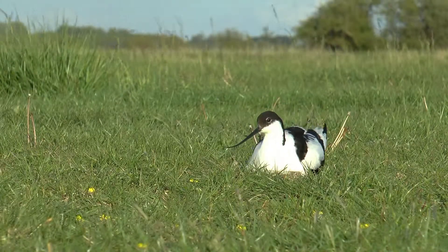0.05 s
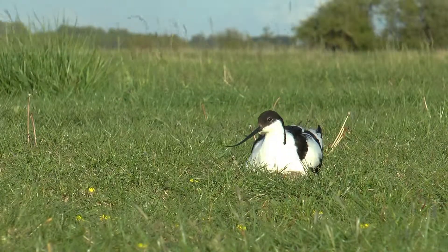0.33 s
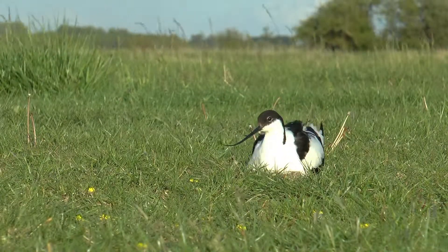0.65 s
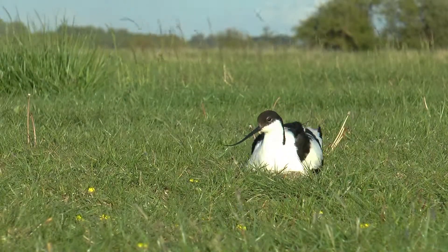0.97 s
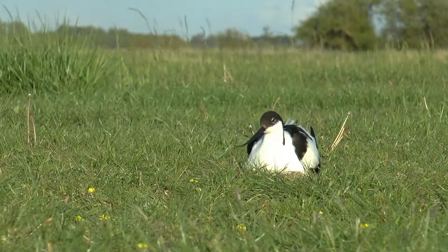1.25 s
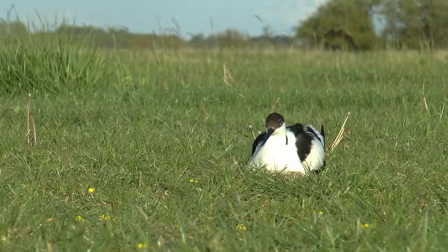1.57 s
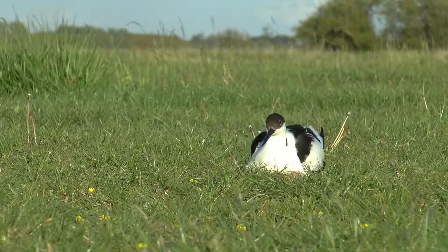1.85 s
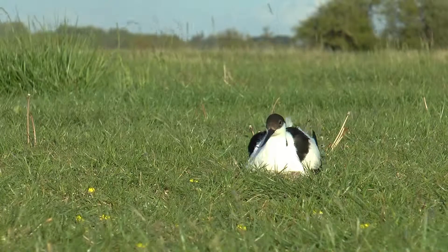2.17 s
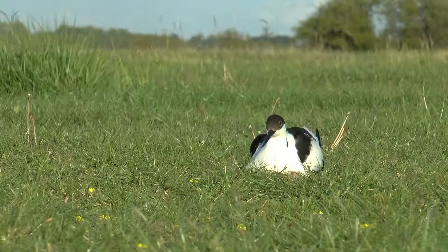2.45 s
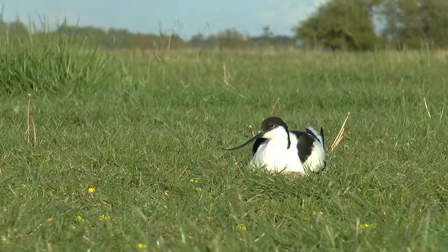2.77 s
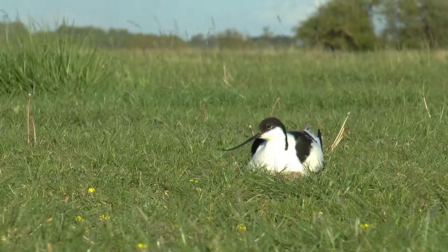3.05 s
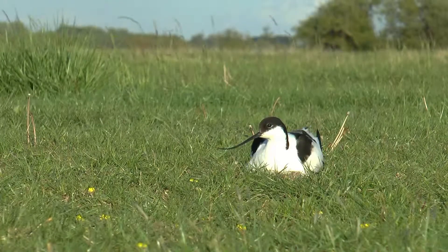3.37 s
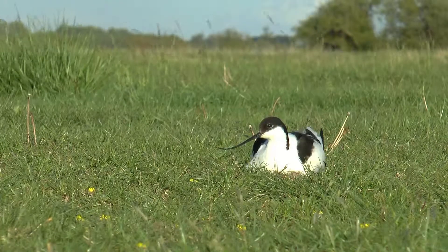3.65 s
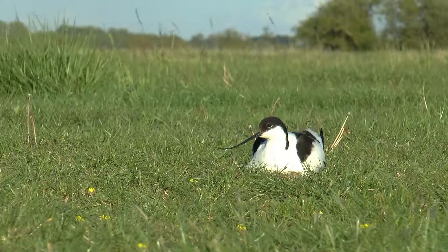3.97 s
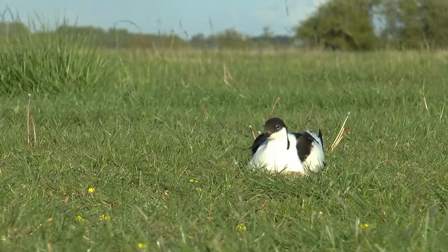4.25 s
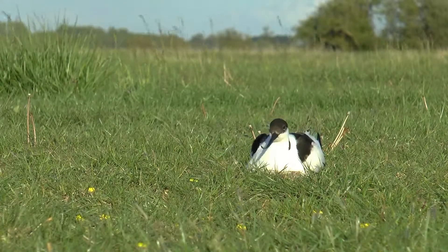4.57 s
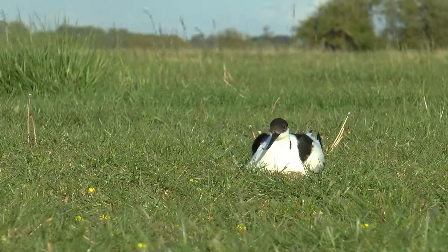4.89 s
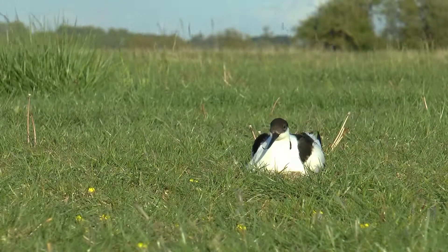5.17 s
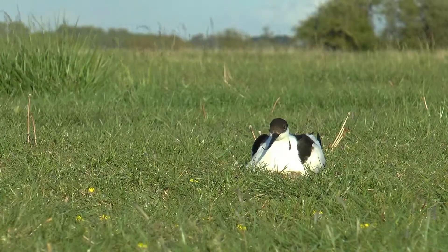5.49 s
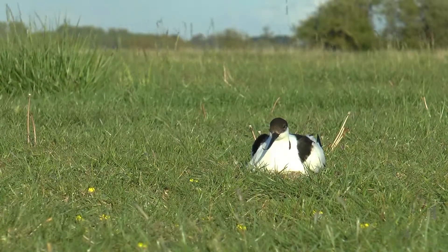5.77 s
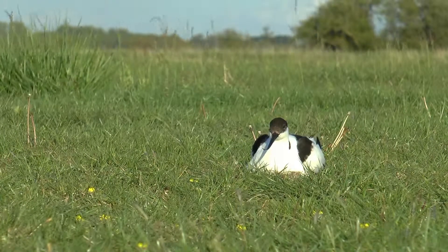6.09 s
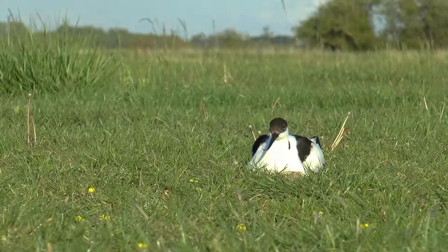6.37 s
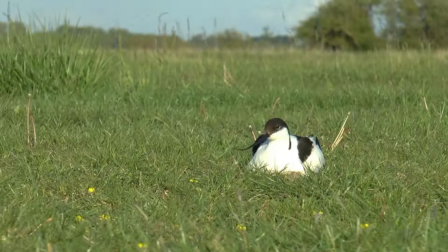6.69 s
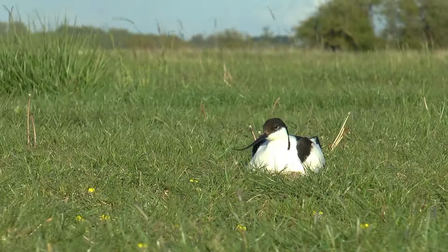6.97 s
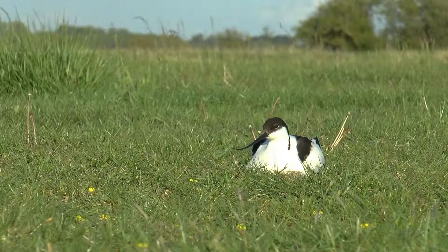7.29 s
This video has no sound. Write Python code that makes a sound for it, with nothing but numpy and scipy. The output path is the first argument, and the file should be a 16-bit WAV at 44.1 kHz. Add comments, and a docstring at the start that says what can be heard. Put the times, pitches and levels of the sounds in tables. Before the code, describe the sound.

Wind rumbles on a stereo microphone in an open meadow, with frequent fluttering gusts. Beneath it, wading birds repeat high, fluty two-part whistles, between two and three a second, mixed with short sharp notes. About halfway through, a distant bird starts a run of faint pips and another answers. The nearer calls grow louder, peak with one sharp yelp, then fade while the gusts carry on.

```python
"""A breeze rises over the hiss of a meadow and the wash of a far colony; gusts buffet a stereo microphone.
From the start avocets whistle "ku-lee" calls and short "kip" notes, each an arch of pitch with harmonics.
Near 3.7 s comes a held note, then a far bird's run of pips, which lower pips soon answer.
The calls are loudest around 5 s and a sharp yelp follows at 5.5 s. Then they fade, and two faint
falling whistles cross the meadow while the gusts go on."""
import sys
import numpy as np
from scipy import signal
from scipy.fft import rfft, irfft
from scipy.io import wavfile
from scipy.ndimage import uniform_filter1d

SR = 44100
rng = np.random.default_rng(int(sys.argv[2]) if len(sys.argv) > 2 else 0)


def persist_wave(psi):
    """Save psi, clipped to +-1, as 16-bit WAV."""
    counts = np.round(np.clip(psi, -1, 1) * 32767).astype(np.int16)
    wavfile.write(sys.argv[1], SR, np.atleast_2d(counts).T)


N = 332514
TIME_S, BIN_HZ = np.arange(N) / SR, np.arange(N // 2 + 1) * SR / N

# arch of a far pip: (time [share of length], pitch [share of top], relative level [dB])
PIP_ARCH = [(0, .78, -13), (.22, .95, -4), (.5, 1, 0), (.78, .97, -4), (1, .81, -14)]


def undb(db):
    """Amplitude grows tenfold for every 20 dB."""
    return 10 ** (np.asarray(db) / 20)


def unit(x):
    """Normalisation to an rms of 1."""
    return x / np.sqrt(np.mean(x ** 2))


def on_log(table, hz):
    """Interpolation of (frequency [Hz], value) points on a logarithmic frequency axis."""
    f, value = np.transpose(table)
    return np.interp(np.log(hz + 1), np.log(f), value)


def noise(gain):
    """Spectral shaping: white noise weighted by a gain at each frequency bin."""
    return irfft(rfft(rng.standard_normal(N)) * gain, N)


def walk(rate_hz):
    """Random modulation of rms 1: stepped values, smoothed twice."""
    hold = max(int(SR / rate_hz), 2)
    steps = np.repeat(rng.standard_normal(N // hold + 1), hold)
    return unit(uniform_filter1d(uniform_filter1d(steps, hold), hold)[:N])


def add(out, s, sound, pan_db=0):
    """Level panning: a mono sound enters at time s, with left exceeding right by pan_db."""
    start = int(s * SR)
    part = sound[:max(N - start, 0)]
    out[:, start:start + len(part)] += undb(np.array([[pan_db], [-pan_db]]) / 2) * part


def wash(spectrum, db, side_db):
    """Partial coherence: independent mid and side noises of one colour make a wide, steady sound."""
    colour = undb(on_log(spectrum, BIN_HZ))
    mid, side = unit(noise(colour)), undb(side_db) * unit(noise(colour))
    return undb(db) * np.array([mid + side, mid - side])


def meadow(swell_db=.8):
    """Incoherent summation: a far colony blurs into a wash, over soft air and microphone hiss."""
    # spectra of the colony and of the hiss: (frequency [Hz], relative density [dB])
    colony_spectrum = [(1000, -13.5), (1500, -7), (2000, -5), (2600, -4), (3150, -5.5), (3600, -13.5),
                       (5000, -12.5), (7000, -33.5)]
    hiss_spectrum = [(100, 3.5), (500, 16.5), (900, 7), (1500, 0), (3700, -5), (7000, -5.5), (8600, -6),
                     (9500, -0.5), (13500, -2)]
    hiss = wash(hiss_spectrum, db=-82.5, side_db=-9)
    colony = wash(colony_spectrum, db=-86, side_db=-6.5)
    return colony * undb(swell_db * walk(13)) + hiss


def hoarse_swells(centre_hz=2200, width_hz=370, width_s=.075):
    """Amplitude modulation: narrow-band noise rises and sinks like a hoarse bird very far away."""
    # peaks of the swells: (time [s], level [dB])
    peaks = [(.4, -88.5), (4.85, -80.5), (6.56, -83.5)]
    rasp = unit(noise(np.exp(-.5 * ((BIN_HZ - centre_hz) / width_hz) ** 2)))
    return rasp * sum(undb(db) * np.exp(-.5 * ((TIME_S - s) / width_s) ** 2) for s, db in peaks)


def ticks(decay_s=.002):
    """Broadband transients: white noise that decays exponentially is heard as a dry tick."""
    # faint ticks: (time [s], level [dB])
    bursts = [(2.323, -82), (3.659, -80), (4.628, -82), (5.208, -80), (6.781, -83)]
    out, t = np.zeros((2, N)), np.arange(SR // 50) / SR
    for s, db in bursts:
        add(out, s, undb(db) * np.exp(-t / decay_s) * rng.standard_normal(len(t)))
    return out


def airflow(attack_s=.025, release_s=.029, surge_hz=22, surge_db=.08):
    """Power addition of breeze and gusts gives rumble and buffeting, in dB against a full gust."""
    # breeze between gusts: (time [s], rumble level [dB])
    breeze = [(0, -39), (.055, -16), (.5, -11.5), (1.1, -7), (2.1, -4.5), (2.3, -8.5), (2.9, -2), (3.6, -5),
              (4.05, -4), (4.3, -8), (4.55, -5.5), (5.02, -15), (5.2, -4.5), (5.5, -6), (5.78, -13),
              (6.1, -6), (7.3, -5), (7.54, -9)]
    # gusts: (time [s], length [s], rumble level [dB], buffeting level [dB])
    gusts = [(.261, 0.041, -9, -23.5), (.524, 0.19, -5.5, -11), (.68, 0.071, 0, -1),
             (0.789, 0.15, -4.5, -2.5), (0.999, .15, -4, -5), (1.258, 0.12, 0, -2.5),
             (1.465, 0.087, 3, 5.5), (1.664, 0.094, -6.5, -4), (1.809, .455, -13, -5),
             (2.364, 0.076, -3.5, -9), (2.565, 0.22, -6, -3.5), (2.811, 0.25, -2.5, -8.5),
             (3.019, 0.28, -4, 1.5), (3.364, 0.25, -14, -8), (3.678, .12, .5, -3.5), (3.84, 0.2, -0.5, -11),
             (4.08, 0.071, 2, -24), (4.338, 0.05, -2, -3), (4.748, .18, -6, -19.5),
             (5.188, 0.061, -0.5, -2), (5.348, 0.077, -2.5, -5.5), (5.605, 0.049, -1, -6),
             (5.872, .19, -3.5, -7.5), (6.303, 0.092, 1.5, -6.5), (6.466, 0.042, -1, -15),
             (6.701, 0.21, -5, -6), (6.951, 0.25, -6.5, -4)]
    breeze_db = np.interp(TIME_S, *np.transpose(breeze))
    rumble = undb(breeze_db)
    buffet = undb(.8 + 2.5 * breeze_db)  # grows steeply as the breeze freshens
    for s, length, rumble_db, buffet_db in gusts:
        rise = np.clip((TIME_S - s) / attack_s, 0, 1)
        swell = rise * np.exp(-np.maximum(TIME_S - s - length, 0) / release_s)
        rumble = np.hypot(rumble, undb(rumble_db) * swell)
        buffet = np.hypot(buffet, undb(buffet_db) * swell)
    return 20 * np.log10([rumble, buffet]) + surge_db * walk(surge_hz)


def wind(gust_db=-42, eddy_hz=90, eddy_db=3.0, crackle_hz=330, crackle_db=1.9, flicker_db=.82,
         steepen=.35, split_hz=(140, 380), left_db=1.5):
    """Turbulent pressure: eddies on the capsules make a deep rumble and, in gusts, a rough flutter."""
    # spectrum of a full gust: (frequency [Hz], relative density [dB])
    gust_spectrum = [(20, -19.5), (54, -5.5), (103, 1.5), (200, -4), (340, -11), (420, -15), (490, -25),
                     (560, -21), (640, -29), (735, -24.5), (980, -38.5), (1450, -43.5), (2000, -44.5),
                     (5000, -70)]
    # the wind differs between the capsules: (frequency [Hz], side minus mid level [dB])
    gust_width = [(60, -16.5), (110, -10), (200, -2), (360, 7.5), (670, 11.5), (1210, 11.5), (2210, 8),
                  (4040, 0)]
    rumble_db, buffet_db = airflow()
    colour = undb(on_log(gust_spectrum, BIN_HZ)) * (BIN_HZ < 5500)
    colour = undb(gust_db) * unit(colour)
    width, octave = undb(on_log(gust_width, BIN_HZ)), np.log2(BIN_HZ + 1)
    eddies, crackle = walk(eddy_hz), walk(crackle_hz)
    mid = side = 0
    for hz in 30 * 2. ** np.arange(8):
        band = colour * np.cos(np.pi / 2 * np.clip(octave - np.log2(hz), -1, 1))
        share = np.interp(np.log(hz), np.log(split_hz), [0, 1])  # 0 is rumble, 1 is buffeting
        # small eddies need more speed, so the treble comes and goes more steeply
        octaves_up = max(np.log2(hz / 480), 0)
        steepness = 1 + steepen * octaves_up
        gain = undb((1 - share) * rumble_db + share * steepness * buffet_db)
        # passing eddies shake the upper bands together; the smallest make the treble crackle
        rough_db = share * eddy_db * eddies + octaves_up * crackle_db * crackle + flicker_db * walk(25)
        envelope = gain * unit(undb(rough_db))
        mid = mid + envelope * noise(band)
        side = side + envelope * noise(band * width)
    return np.array([mid + side, mid - side]) * undb(np.array([[left_db], [-left_db]]) / 2)


def scatter(birds, t60_s, wet_db, dull_hz):
    """Diffuse scattering: grass and far trees send back a dull, exponentially decaying tail."""
    t = np.arange(SR) / SR
    tail = rng.standard_normal((2, SR)) * undb(-60 * t / t60_s)
    tail /= np.sqrt(np.sum(tail ** 2, axis=1, keepdims=True))
    mid, side = signal.sosfilt(signal.butter(2, dull_hz, fs=SR, output="sos"), tail)
    response = np.array([mid + .4 * side, mid - .4 * side])
    return undb(wet_db) * signal.fftconvolve(birds, response, axes=1)[:, :N]


def capsules(birds):
    """Phase difference: two capsules hear the birds slightly apart."""
    # lead of the left capsule: (frequency [Hz], phase [rad])
    phase_lead = [(1500, .7), (2700, .7), (3300, .55), (4700, .15), (5600, -.2), (6300, -.25), (8000, 0)]
    lead = on_log(phase_lead, BIN_HZ)
    return irfft(rfft(birds) * np.exp(.5j * np.array([lead, -lead])), N)


def whistle(s, hz, db, overtones_db, waver=.0027, flutter_db=1.0, overtone_flutter_db=1.5,
            brighten=.22, glide_s=.004, edge_s=.001):
    """Source and filter: the syrinx glides through the given points; the throat shapes its harmonics."""
    # response of throat and bill: (frequency [Hz], gain [dB])
    throat = [(3600, 0), (4400, 5), (5200, 2), (5650, -3), (6300, 0), (7400, -3), (7900, -9), (8400, -17),
              (8850, -9), (9250, 0), (10500, -1), (13000, -3)]
    t = np.arange(s[0], max(s[-1], s[0] + .01), 1 / SR)
    ease = max(int(glide_s * SR), 2)
    jitter = uniform_filter1d(rng.standard_normal((6, SR // 5)), ease, axis=1)[:, :len(t)] * np.sqrt(ease)
    pitch = uniform_filter1d(np.interp(t, s, hz), ease, mode="nearest") * (1 + waver * jitter[0])
    phase = 2 * np.pi * np.cumsum(pitch) / SR
    effort_db = np.interp(t, s, db) + flutter_db * jitter[1]
    tone = np.sin(phase)
    for k, top_db in enumerate(overtones_db, 2):  # against the fundamental, at the top of the arch
        throat_db = on_log(throat, k * pitch) - on_log(throat, k * max(hz))
        fade_db = brighten * (effort_db - max(db))  # overtones fade faster as the bird eases off
        tone += undb(top_db + throat_db + fade_db + overtone_flutter_db * jitter[k]) * np.sin(k * phase)
    gate = np.clip(np.minimum(t - t[0], t[-1] - t) / edge_s, 0, 1)
    return np.sqrt(2) * tone * gate * undb(effort_db)


def note(arch, length_s, top_hz, db, overtones_db):
    """Contour scaling: an arch is stretched to a length, pitch and level, and whistled."""
    part, pitch, swell_db = np.transpose(arch)
    return whistle(part * length_s, pitch * top_hz, db + swell_db, overtones_db)


def chatter(count=64, base_db=-91, spread_db=8.0, top_hz=3150, length_s=.061):
    """A random point process: the farthest avocets pipe independently of one another."""
    out = np.zeros((2, N))
    for when, size, pitch, loud, pan in rng.uniform(-.83, 1, (count, 5)):
        length, hz = length_s * (1 + .23 * size), top_hz * (1 + .08 * pitch)
        pip = note(PIP_ARCH, length, hz, base_db + spread_db * loud, overtones_db=[-14])
        add(out, (when + 1) / 2 * N / SR, pip, pan_db=3 * pan)
    return out


def far_birds(pip_s=.065, answer_from_s=4.7, answer_after_s=.148, answer_hz=3157,
              flicker_db=2.5, flicker_hz=60):
    """Scintillation: moving air makes the pips and falling whistles from across the meadow flicker."""
    # a run of high pips: (time [s], top pitch [Hz], relative level [dB])
    pips = [(3.784, 3350, -83), (4.06, 3570, -79.5), (4.323, 3390, -75.5), (4.589, 3240, -74),
            (4.853, 3407, -70), (5.122, 3345, -73.5), (5.386, 3370, -70), (5.648, 3385, -72),
            (5.91, 3300, -72), (6.185, 3267, -75), (6.456, 3316, -72), (6.735, 3325, -73.5),
            (7.01, 3330, -77.5), (7.304, 3290, -77.5)]
    # a small bird's falling whistles: (time [s], relative level [dB])
    slides = [(5.985, -82.5), (6.778, -85)]
    # contour of each: (time from onset [s], pitch [Hz], relative level [dB])
    slide_contour = [(0, 5650, -7), (.012, 5000, 1), (.028, 4520, 0), (.05, 4320, -2), (.085, 4270, -4),
                     (.1, 4250, -14)]
    out = chatter()
    for (s, hz, db), detune in zip(pips, .014 * rng.standard_normal(len(pips))):
        add(out, s, note(PIP_ARCH, pip_s, hz, db, overtones_db=[-7, -18]))
        if s > answer_from_s:
            answer = note(PIP_ARCH, pip_s, answer_hz * (1 + detune), db - 1.5, overtones_db=[-13, -18])
            add(out, s + answer_after_s, answer)
    t, hz, swell_db = np.transpose(slide_contour)
    for s, db in slides:
        add(out, s, whistle(t, hz, db + swell_db, overtones_db=[]))
    return out * unit(undb(flicker_db * walk(flicker_hz)))


def near_avocets(ku_s=.046, pan_db=-.5):
    """Frequency modulation: the nearer birds bend their whistles into calls, kips, a held note, a yelp."""
    # two-part calls: (time of the dip between parts [s], lee length [s], ku top [Hz], lee top [Hz],
    # ku level [dB], lee level [dB], ku and lee 2nd harmonics against the fundamental [dB])
    calls = [(0.215, 0.11, 2830, 3124, -74, -82, -29, -14), (0.566, 0.11, 2915, 3150, -82, -76.5, -20, -19),
             (0.912, 0.14, 2800, 3080, -85, -83.5, -12, -30),
             (1.285, 0.11, 2880, 3201, -72.5, -73.5, -24, -13),
             (1.664, 0.1, 2850, 3130, -78, -78, -35, -24),
             (2.011, 0.11, 2890, 3165, -76.5, -69.5, -10, -14.5),
             (2.366, 0.11, 2850, 3100, -61.5, -65, -20.5, -13),
             (2.734, .109, 2825, 3170, -72.5, -73, -10.5, -9.5),
             (3.101, .099, 2940, 3087, -68.5, -62.5, -32, -27.5),
             (3.48, 0.12, 2750, 3114, -73, -61.5, -6.5, -8.5),
             (3.879, .111, 2840, 3106, -65.5, -65, -27, -16.5),
             (4.274, 0.1, 2844, 3086, -64.5, -62, -15.5, -25),
             (4.668, 0.14, 2776, 3066, -59, -61, -16, -19.5),
             (5.086, .119, 2775, 3005, -59.5, -62, -15.5, -17.5),
             (5.497, 0.13, 2710, 2976, -63, -61.5, -12.5, -18),
             (5.919, .13, 2740, 2980, -68, -72, -21, -12.5), (6.352, 0.1, 2770, 2950, -73, -77.5, -19, -12),
             (6.78, .106, 2730, 3000, -73, -70.5, -21, -31), (7.2, 0.12, 2735, 3000, -87, -79.5, -20, -26)]
    # short notes: (time [s], length [s], top pitch [Hz], level [dB], relative 2nd harmonic [dB])
    kips = [(.273, 0.032, 2472, -63.5, -21), (.557, 0.037, 2530, -59, -12.5),
            (.833, .048, 2465, -60.5, -14), (1.963, 0.018, 2130, -71, -7.5), (2.63, 0.044, 2302, -68, -6),
            (3.005, .045, 2427, -64, -7), (4.256, 0.049, 2584, -59, -8), (4.907, 0.039, 2528, -56.5, -9),
            (5.205, 0.054, 2494, -57.5, -5)]
    # arches of the notes: (time [share of length], pitch [share of top], relative level [dB])
    ku_arch = [(0, .84, -13), (.12, .96, -2), (.3, 1, 1), (.55, .94, -1), (.78, .79, -7), (1, .68, -15)]
    lee_arch = [(0, .62, -15), (.07, .76, -8), (.135, .945, -1.5), (.23, .992, 0), (.35, 1, 0),
                (.52, .986, 0), (.68, .966, -.5), (.83, .915, -2), (.91, .84, -5.5), (1, .62, -19)]
    kip_arch = [(0, .89, -4), (.13, .95, -1), (.27, .99, 0), (.4, 1, .5), (.55, .987, 0), (.7, .948, -2),
                (.85, .88, -5.5), (1, .8, -17)]
    # contours of the held note and the yelp: (time [s], pitch [Hz], level [dB])
    held = [(3.659, 2350, -59), (3.672, 2525, -57.5), (3.685, 2605, -57), (3.72, 2582, -57),
            (3.733, 2530, -57), (3.741, 2410, -62), (3.748, 2250, -80)]
    yelp = [(5.531, 2260, -53), (5.543, 2410, -49), (5.556, 2640, -46.5), (5.568, 2850, -47),
            (5.579, 2560, -48), (5.588, 2290, -56), (5.594, 2200, -70)]
    out = np.zeros((2, N))
    # the upper overtones lie a set number of dB below the second harmonic
    for s, lee_s, ku_hz, lee_hz, ku_db, lee_db, ku_second_db, lee_second_db in calls:
        ku = note(ku_arch, ku_s, ku_hz, ku_db, ku_second_db - np.array([0, 20]))
        lee = note(lee_arch, lee_s, lee_hz, lee_db, lee_second_db - np.array([0, 8, 24]))
        add(out, s - ku_s, ku, pan_db)
        add(out, s, lee, pan_db)
    for s, length, hz, db, second_db in kips:
        add(out, s, note(kip_arch, length, hz, db, second_db - np.array([0, 18, 23])), pan_db)
    add(out, held[0][0], whistle(*np.transpose(held), overtones_db=[-10, -17, -25, -38]))
    add(out, yelp[0][0], whistle(*np.transpose(yelp), overtones_db=[-16, -33, -50]), pan_db=-1.5)
    return out


def scene(far_direct_db=-6):
    """Superposition: almost dry near birds and far ones smeared by the grass sound amid wind and hiss."""
    near, far = near_avocets(), far_birds()
    far = undb(far_direct_db) * far + scatter(far, t60_s=.2, wet_db=-4, dull_hz=6000)
    ground = scatter(near, t60_s=.06, wet_db=-23, dull_hz=5000)
    tail = scatter(near + far, t60_s=.97, wet_db=-31, dull_hz=3540)
    return capsules(near + far + ground + tail) + ticks() + wind() + meadow() + hoarse_swells()


def record(dry, top_hz=13500):
    """Band limiting: a steep low-pass filter cuts the highest treble."""
    return signal.sosfilt(signal.ellip(8, .2, 70, top_hz, fs=SR, output="sos"), dry)


dry = scene()
out = record(dry)
persist_wave(out)
```